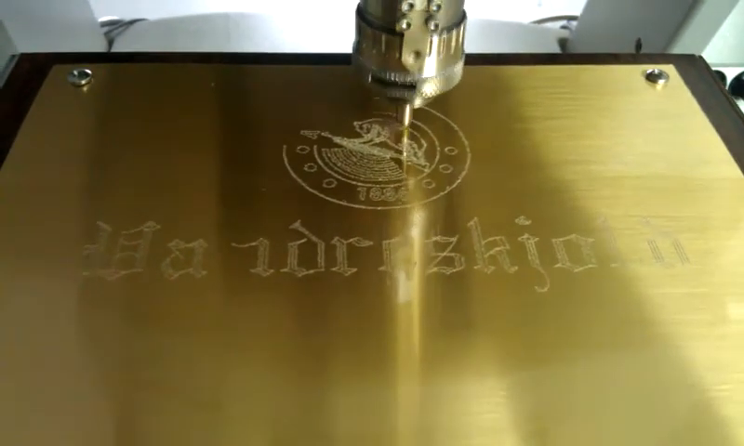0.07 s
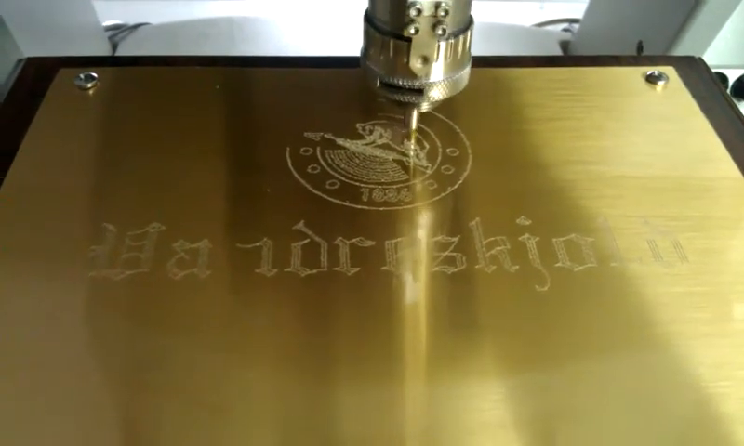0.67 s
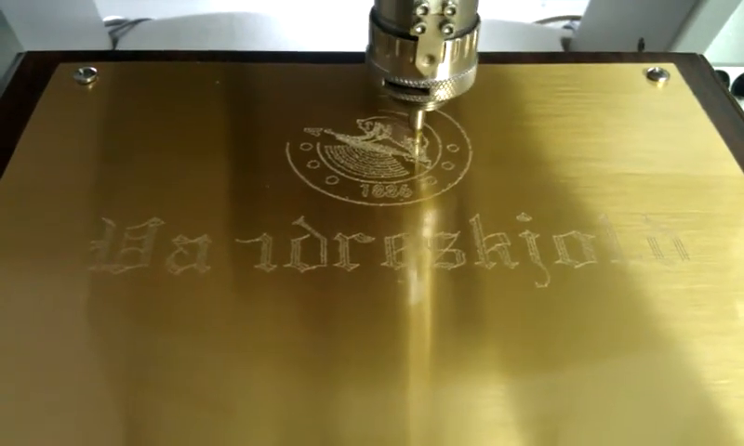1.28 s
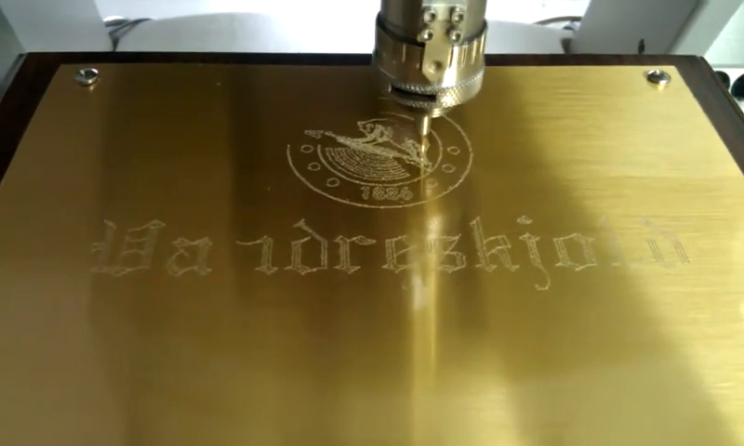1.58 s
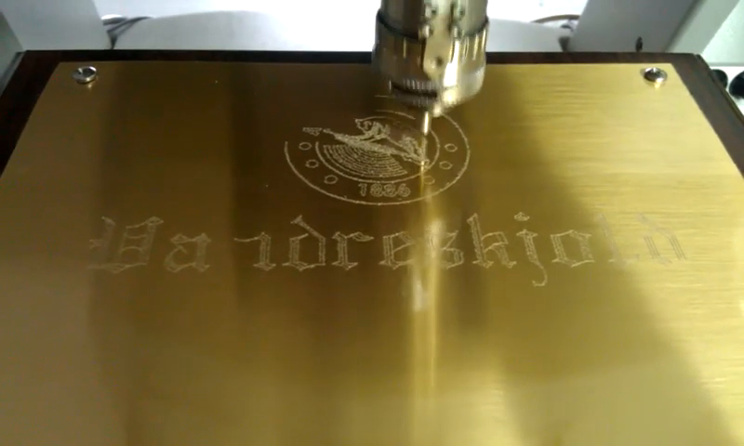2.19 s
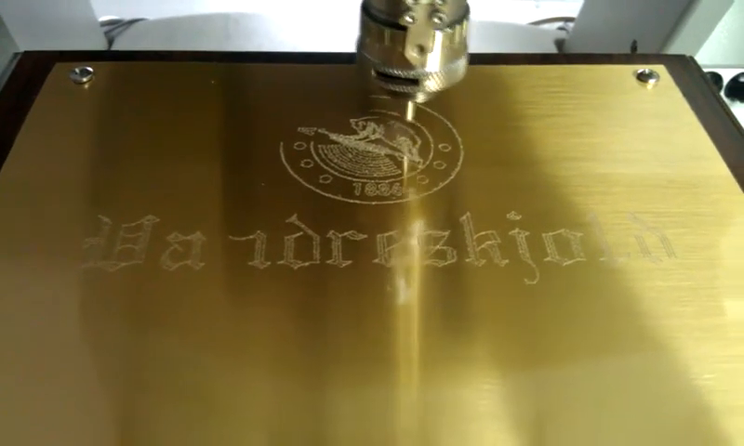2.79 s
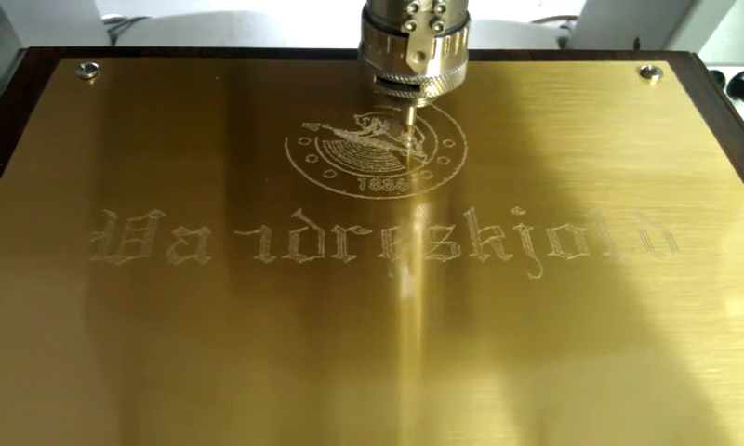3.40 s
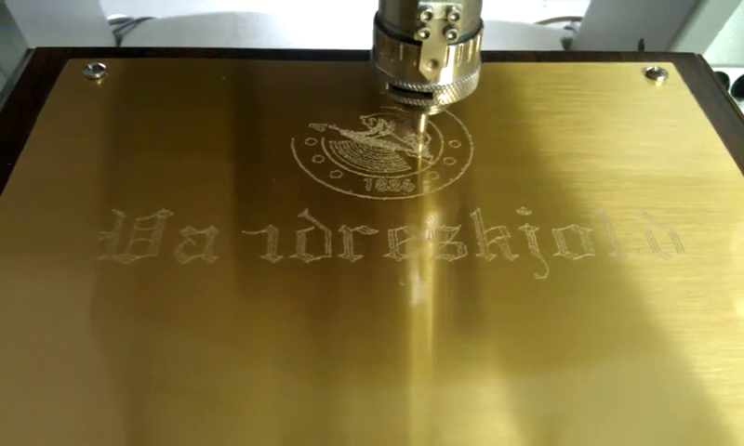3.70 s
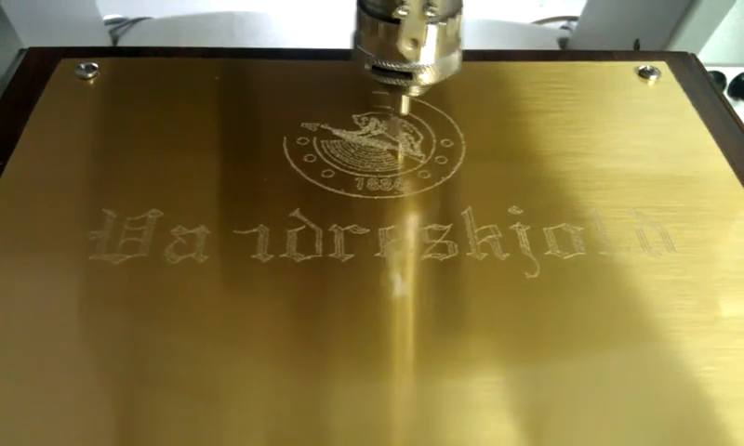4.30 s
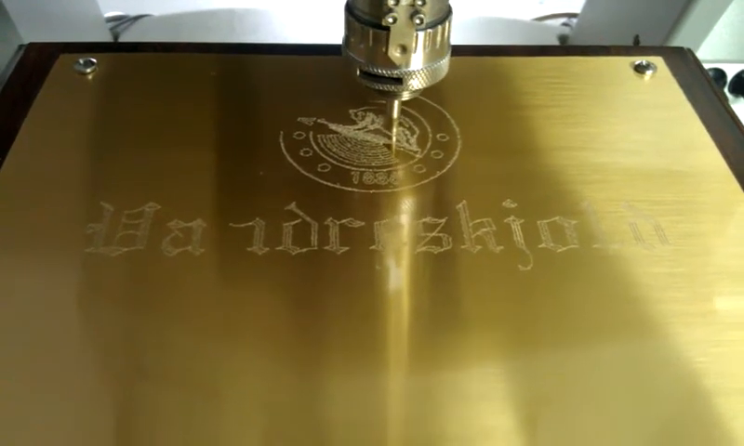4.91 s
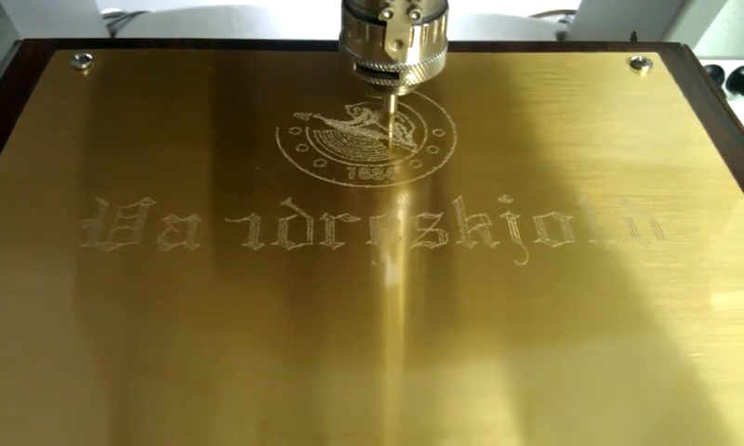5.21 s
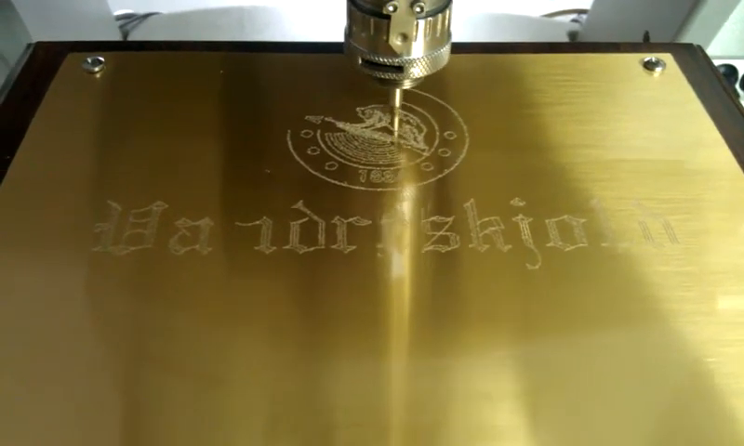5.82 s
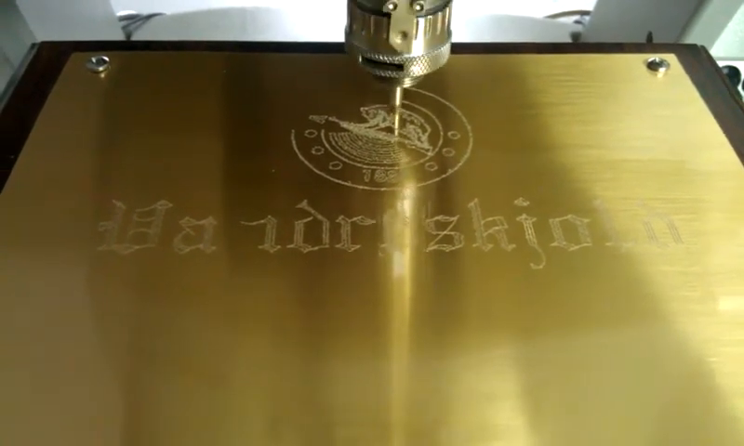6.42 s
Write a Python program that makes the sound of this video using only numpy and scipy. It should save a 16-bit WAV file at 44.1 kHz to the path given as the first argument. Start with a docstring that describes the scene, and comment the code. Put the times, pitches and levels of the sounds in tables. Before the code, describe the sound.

An engraving machine marks a brass plate in a workshop. At first its stylus lifts and drops in a regular pattern of sharp clacks, each with a tiny motor whine. Then the clacks thin out, and the feed motors whirr in uneven runs while the tip scrapes in dry swishes and chatters in the cut. Regular clacks return near the end. The microphone is close, with faint steady room noise behind.

```python
"""A computer-driven engraver marks a brass plate in a workshop, close to a small mono microphone.
A stepper motor lifts the stylus and sets it down with a clack: each move speeds up, cruises and brakes,
sweeping its whine through the modes of the frame while the slide knocks. Between the clacks the feed
motors whirr along each line, and the tip scrapes in dry swishes and chatters in the cut.
Bench and housing give short reflections; the steady noise of the shop lies far behind."""
import sys
import numpy as np
from scipy import signal
from scipy.fft import rfft, irfft
from scipy.io import wavfile

SR = 44100
rng = np.random.default_rng(int(sys.argv[2]) if len(sys.argv) > 2 else 0)


def dump(signal):
    """Clip the signal to [-1, 1] and save it as 16-bit WAV at the path in sys.argv[1]."""
    limited = np.clip(np.atleast_2d(signal).T, -1, 1)
    pcm = np.round(limited * 32767).astype(np.int16)
    wavfile.write(sys.argv[1], SR, pcm)


N = 284445

# The stylus comes up. Each row: start in seconds, squeak of the slide in dB, low thud in dB.
LIFTS = [(.0415, -39.5, -34), (.6541, -38, -58), (1.2732, -36.5, -47), (1.901, -46, -35),
         (2.5603, -65, -68), (4.1046, -65, -35), (5.3656, -65, -43), (6.0452, -64, -42)]
# Modes of the carriage. Each row: frequency in Hz, width in Hz, level in dB.
CARRIAGE_MODES = [(194, 37, -7), (248, 41, -6), (293.2, 44.6, 2), (390, 77, -3.5), (473, 35, 3.5),
                  (587, 88, -3), (653, 51, 0.5), (747, 53, -4), (894, 45, -10.5), (1005, 42, -14),
                  (1340, 55, -15)]


def stylus():
    """Lifts run one programmed move and squeak as the slide comes to rest; drops run another and thump."""
    # The stylus goes down. Each row: start in seconds, level of its knocks in dB, of its thump in dB.
    drops = [(0.2891, .5, -18.5), (.8998, 0, -17), (1.5274, -.5, -18), (2.169, -2, -25), (2.8529, 0, -23),
             (4.3797, -2, -24), (5.6864, 0, -17), (6.2787, 2, -15)]
    # Each move: seconds speeding up, cruising and braking; drive in dB speeding up and braking;
    # hiss in dB speeding up and braking.
    lift_move = (0.0679, 0.0322, 0.068, -10, -14, -26.5, -32)
    drop_move = (0.045, 0.06, 0.029, -16.5, -13.5, -32, -32.5)
    # Contacts of the slide. Each row: seconds into the move, level in dB, corner in Hz, clash in dB.
    lift_knocks = [(0.0134, -18, 2520, -23), (.0288, 0, 800, -36), (.0422, -1, 1590, -31),
                   (.0555, 4, 3000, -13.5), (.0579, 7.5, 540, -21), (.067, -2, 2000, -26),
                   (.129, -4, 1300, -42)]
    drop_knocks = [(.0245, -7, 1720, -38), (.0305, -2, 1160, -36), (.0847, -8, 1100, -38),
                   (.0908, 6, 673, -25), (.0954, 3, 1100, -23), (.1027, 2.5, 600, -33),
                   (.1151, 1, 972, -27)]
    out = np.zeros(N)
    for s, squeak_db, _ in LIFTS:
        add(out, s, move(lift_move, lift_knocks, knocks_db=0))
        add(out, s + 0.17, undb(squeak_db) * squeak())
    for s, knocks_db, thump_db in drops:
        add(out, s + .0828, undb(thump_db) * thump())
        add(out, s, move(drop_move, drop_knocks, knocks_db))
    return out


def move(program, knocks, knocks_db, start_hz=200, cruise_hz=1600, rasp=.6, wobble=.033, rattle_db=-11):
    """One stroke: the motor's whine sweeps through the frame's modes, the slide knocks, metal clashes."""
    # Modes of the frame and plate. Each row: frequency in Hz, width in Hz, level in dB.
    frame_modes = [(287, 40, -10), (375, 58, -10), (473, 34, -7.5), (612, 24, -9), (675, 40, -6),
                   (745, 35, 5.5), (825, 40, -11), (1020, 38, 1.3), (1163, 31, 2), (1250, 50, -8),
                   (1350, 32, 2), (1597, 22, -11.5), (1702, 45, -5.5), (1775, 40, -4.5), (2030, 105, -9),
                   (2248, 70, -3.5), (2840, 60, -20), (3017, 50, -17), (3375, 60, -19)]
    # Spectra of the lead screw's rattle and the driver's hiss. Each row: frequency in Hz, level in dB.
    rattle_spectrum = [(2400, 0), (7000, -35)]
    hiss_spectrum = [(500, 10), (2000, 7), (4500, 3.5), (6200, 0), (7200, -3), (9500, 0), (12000, -9),
                     (15500, -40)]
    # Overtones of the motor's casing. Each row: multiple of the step rate, level in dB.
    casing_overtones = [(3, -55), (4, -64), (4.25, -67), (4.75, -65), (5, -61), (5.75, -66), (6.75, -68)]
    size = SR // 4
    t = np.arange(size) / SR
    up_s, cruise_s, brake_s, up_db, brake_db, up_hiss_db, brake_hiss_db = program
    stages = np.cumsum([0, up_s, cruise_s, brake_s])
    step_hz = np.interp(t, stages, [start_hz, cruise_hz, cruise_hz, start_hz])
    running = np.clip((stages[-1] - t) / 0.0017, 0, 1)
    drive = running * near(step_hz, peak_hz=1020, octave_loss_db=22)
    drive *= undb(np.interp(t, stages[1:3], [up_db, brake_db]))
    hiss = running * near(step_hz, peak_hz=810, octave_loss_db=24)
    hiss *= undb(np.interp(t, stages[1:3], [up_hiss_db, brake_hiss_db]))
    judder = 1 + rasp * walk(800, size)
    force = drive * judder * stepper(step_hz * (1 + wobble * walk(500, size)), overtones_db=[-16])
    # the lead screw rattles as hard as the motor shakes it
    force += undb(rattle_db) * drive * noise(rattle_spectrum, size)
    # the casing sings only near full speed
    phase = 2 * np.pi * np.cumsum(step_hz) / SR
    casing = (step_hz / cruise_hz) ** 20 * sum(undb(db) * np.sin(k * phase) for k, db in casing_overtones)
    airborne = hiss * noise(hiss_spectrum, size) + casing
    scatter = rng.standard_normal((len(knocks), 2))
    for (s, db, corner_hz, clash_db), (late, strong) in zip(knocks, scatter):
        contact_s, contact_db = s + .00015 * late, knocks_db + 1.2 * strong
        add(force, contact_s, undb(db + contact_db) * knock(corner_hz))
        add(airborne, contact_s, undb(clash_db + contact_db) * clash(corner_hz))
    # the frame rings a little differently at each place on the plate
    return ring(force, frame_modes, direct=0.036, detune=.005, uneven_db=0.68, opposed=False) + airborne


def stepper(hz, overtones_db):
    """Torque ripple of a stepper motor: the step rate and its overtones."""
    phase = 2 * np.pi * np.cumsum(hz) / SR
    return np.sin(phase) + sum(undb(db) * np.sin(k * phase) for k, db in enumerate(overtones_db, 2))


def knock(corner_hz):
    """Force of one contact, a push and its rebound: the softer it is, the longer it lasts."""
    u = 2 * np.pi * corner_hz * np.arange(SR // 50) / SR
    return 120 * corner_hz / SR * u ** 2 * (1 - u / 3) * np.exp(-u)


def clash(corner_hz, decay_s=0.0062, reach=4):
    """Loose metal parts strike each other: a short, dense burst, duller after a softer contact."""
    # Spectrum of the loose metal. Each row: frequency in Hz, level in dB.
    metal_spectrum = [(100, -45), (300, 6), (2000, 3), (5800, 1), (7000, -10.5), (11000, -21), (15000, -38)]
    t = np.arange(SR // 10) / SR
    burst = np.exp(-t / decay_s) * rng.standard_normal(len(t))
    dulled = [(hz, db - 10 * np.log10(1 + (hz / (reach * corner_hz)) ** 2)) for hz, db in metal_spectrum]
    return np.std(burst) * colour(np.roll(burst, SR // 2000), dulled) * (1 - t / t[-1])


def thump(hz=345, rise_s=0.0069, waver=0.11):
    """The stylus lands and its holder bounces on the plate for a few cycles."""
    t = np.arange(SR // 12) / SR
    phase = 2 * np.pi * np.cumsum(hz * (1 + waver * walk(249, len(t)))) / SR
    return t / rise_s * np.exp(1 - t / rise_s) * np.sin(phase)


def squeak(hz=8100, width_hz=600, rise_s=0.0037):
    """A brief, narrow chirp of friction in the slide."""
    t = np.arange(SR // 20) / SR
    phase = 2 * np.pi * np.cumsum(hz + width_hz / 2 * walk(1900, len(t))) / SR
    return t / rise_s * np.exp(1 - t / rise_s) * np.sin(phase)


def thuds(hz=76, decay_s=0.0047):
    """A short, low thud under the loudest clack of each lift."""
    out = np.zeros(N)
    t = np.arange(SR // 10) / SR
    for s, _, db in LIFTS:
        add(out, s + 0.054, undb(db) * np.exp(-t / decay_s) * np.sin(2 * np.pi * hz * t))
    return out


def feed_effort(creep_db=-41.5, spurt_db=2.4, spurts_per_s=38):
    """How hard the feed motors work: a slow creep, and runs that start, go on unevenly and stop."""
    # Runs of the feed motors. Each row: start in seconds, length in seconds, level in dB.
    runs = [(0, .06, -28), (.48, 0.018, -35), (.58, .12, -32.5), (1.063, 0.037, -33.5), (1.238, 0.094, -31),
            (1.468, 0.071, -33.5), (1.725, 0.23, -33.5), (2.43, 0.19, -30.5), (2.785, 0.065, -28.5),
            (3.06, .03, -37), (3.315, .03, -35), (3.422, 0.526, -28.5), (3.99, .14, -28.5),
            (4.65, 0.029, -37), (4.786, 0.62, -28), (5.608, 0.085, -30.5), (5.98, .09, -34)]
    # after every lift the carriage travels to the next stroke
    after_s, travel_s, travel_db = 0.185, 0.065, -37.5
    travels = [(s + after_s, travel_s, travel_db) for s, _, _ in LIFTS]
    gains = [undb(db) * swell(s, length_s, rise_db_per_s=143, fall_db_per_s=240)
             for s, length_s, db in runs + travels]
    spurts = unit(undb(spurt_db * walk(spurts_per_s, N)))
    return np.maximum(undb(creep_db), np.max(gains, axis=0)) * spurts


def feed(effort, step_hz=270, spread_octaves=.45, whirr_db=-9, rumble_db=-5):
    """The feed motors follow the drawing in tiny strokes; each change of direction jerks the carriage."""
    # Spectrum of the force on the carriage. Each row: frequency in Hz, level in dB.
    force_spectrum = [(70, -2.5), (190, 0), (330, 1), (480, -1.5), (1200, .5), (2300, -9), (6000, -30),
                      (12000, -64)]
    # Jolts at sharp corners of the drawing. Each row: start in seconds, level in dB.
    corners = [(3.132, -34), (3.277, -40), (3.388, -25), (3.568, -27), (3.655, -29), (3.73, -29.5),
               (3.811, -31), (3.908, -24), (4.025, -30), (4.708, -32), (4.762, -30.5), (4.858, -28.5),
               (4.895, -27.5), (4.953, -22.5), (5.1, -33), (5.155, -26), (5.254, -31), (5.59, -30.5)]
    whirr = unit(stepper(step_hz * 2 ** (spread_octaves * walk(28, N)), overtones_db=[-2, -2, -6]))
    turns = rng.random(N) < 250 / SR  # about 250 a second
    jerks = unit(turns * rng.choice([-1, 1], N) * rng.uniform(.3, 1, N))
    rolling = undb(rumble_db) * rng.standard_normal(N)
    force = colour(jerks + rolling, force_spectrum) + undb(whirr_db) * whirr
    out = effort * unit(ring(force, CARRIAGE_MODES, direct=0.089))
    for s, db in corners:
        add(out, s, undb(db) * shudder())
    return out


def shudder(decay_s=.012, corner_hz=420):
    """A sharp turn shakes the carriage: a short, low rattle, at rms 1 over its first 30 ms."""
    t = np.arange(SR // 8) / SR
    burst = rng.standard_normal(len(t)) * np.exp(-t / decay_s)
    shake = signal.sosfilt(signal.butter(2, corner_hz, fs=SR, output="sos"), burst)
    sound = ring(shake, CARRIAGE_MODES, direct=0.12, detune=.03)
    return sound / np.std(sound[:int(.03 * SR)])


def swishes(effort, groove_db=-23.5, groove_sizzle_db=-11, grit_db=1.5):
    """The tip scrapes the brass, faintly along the groove and strongly in swishes that sizzle on top."""
    # Swishes of the tip. Each row: time of full strength in seconds, hold in seconds, level in dB,
    # sizzle in dB relative to that level, rise and fall in dB per second.
    strokes = [(0, 0.069, -32.5, -13, 299.5, 198), (0.628, 0.053, -36, -12, 400, 200),
               (2.387, 0.19, -35.5, -16, 420, 200), (2.804, 0.082, -40, -22, 300, 200),
               (3.176, 0.016, -26, 0, 578, 125), (3.884, .025, -39.5, -5, 278, 173),
               (4.104, .04, -34.5, -30, 143, 200), (4.31, 0.013, -42, -11, 248, 117),
               (4.415, 0.022, -27.5, 2, 705, 158), (5.17, .1, -47.5, -9, 100, 200),
               (5.312, 0.072, -31.5, -3.5, 650, 198), (5.626, .07, -34, -28, 165, 140),
               (5.722, .12, -27.5, -6, 280, 150), (6.272, 0.13, -47.5, -14, 300, 200)]
    # Spectra of the scrape and its sizzle. Each row: frequency in Hz, level in dB.
    scrape_spectrum = [(150, -55), (500, -14), (1200, -4), (2200, -0.5), (3200, 0.5), (4200, 3.5),
                       (6200, 3.5), (7000, -12), (9000, -11.5), (12000, -74), (15500, -51)]
    sizzle_spectrum = [(1000, -56), (1700, 7), (3500, -1.5), (6500, 10), (8500, 6.5), (11000, 3),
                       (13500, -5), (15800, -9)]
    # at each lift the tip drags brightly until it leaves the brass; same columns as the strokes
    drags = [(s + .028, .024, -44, -1, 800, 900) for s, _, _ in LIFTS]
    scrape = undb(groove_db) * effort
    sizzle = undb(groove_sizzle_db) * scrape
    for s, hold_s, db, sizzle_db, rise_db_per_s, fall_db_per_s in strokes + drags:
        gain = undb(db) * swell(s, hold_s, rise_db_per_s, fall_db_per_s)
        scrape = np.hypot(scrape, gain)
        sizzle = np.hypot(sizzle, undb(sizzle_db) * gain)
    grit = undb(grit_db * walk(220, N))
    return grit * (scrape * noise(scrape_spectrum, N) + sizzle * noise(sizzle_spectrum, N))


def chatter(rise_db_per_s=500, fall_db_per_s=330, grit_db=4):
    """The tip catches in the brass and rattles in brief bursts."""
    # Catches in the cut. Each row: time of full strength in seconds, hold in seconds, level in dB.
    catches = [(3.465, .03, -40), (3.562, 0.024, -37.5), (3.66, 0.013, -36), (3.885, 0.041, -33.5),
               (4.027, 0.076, -37), (4.922, 0.06, -41.5), (5.165, .035, -36), (5.616, 0.068, -31.5)]
    # Spectrum of the tip's force. Each row: frequency in Hz, level in dB.
    tip_spectrum = [(200, -20), (600, -1), (1300, -1.5), (1800, -14.5), (4000, -33)]
    gain = sum(undb(db) * swell(s, hold_s, rise_db_per_s, fall_db_per_s) for s, hold_s, db in catches)
    return gain * unit(noise(tip_spectrum, N) * undb(grit_db * walk(400, N)))


def reflections(x, wet_db=-12, t60_s=0.11, damp_hz=7000):
    """The direct sound, with short reflections from the bench and the machine's housing."""
    t = np.arange(SR // 2) / SR
    tail = rng.standard_normal(len(t)) * undb(-60 * t / t60_s)
    tail = signal.sosfilt(signal.butter(1, damp_hz, fs=SR, output="sos"), tail)
    return x + undb(wet_db) * signal.fftconvolve(x, tail / np.sqrt(np.sum(tail ** 2)))[:N]


def room_tone(level_db=-53.5):
    """The faint, steady noise of the workshop behind the machine."""
    # Spectrum of the shop. Each row: frequency in Hz, level in dB.
    shop_spectrum = [(25, -36), (80, -14), (200, -17), (400, 0), (1100, -9), (2200, -13), (6000, -13.5),
                     (8000, -20.5), (15000, -31.5)]
    return undb(level_db) * noise(shop_spectrum, N)


def ring(force, modes, direct, detune=0, uneven_db=0, opposed=True):
    """A force rings a set of modes, each of which may be a little off in pitch and strength."""
    t = np.arange(SR // 6) / SR
    scatter = rng.standard_normal((len(modes), 2))
    response = np.zeros(len(t))
    for k, ((hz, width_hz, db), (sharp, strong)) in enumerate(zip(modes, scatter)):
        sense = (-1) ** k if opposed else 1  # neighbours swing against each other or together
        gain = sense * undb(db + uneven_db * strong) * 2 * np.pi * width_hz / SR
        response += gain * np.exp(-np.pi * width_hz * t) * np.cos(2 * np.pi * hz * (1 + detune * sharp) * t)
    return signal.fftconvolve(force, response)[:len(force)] + direct * force


def swell(s, hold_s, rise_db_per_s, fall_db_per_s):
    """An envelope that reaches 1 at s seconds, holds and dies away."""
    t = np.arange(N) / SR - s
    return undb(np.minimum(t, 0) * rise_db_per_s - np.maximum(t - hold_s, 0) * fall_db_per_s)


def near(hz, peak_hz, octave_loss_db):
    """Gain of a sound that is strongest at one step rate and falls away on both sides."""
    return undb(-octave_loss_db * np.log2(hz / peak_hz) ** 2)


def colour(x, spectrum):
    """Filter a signal by a curve of (Hz, dB) points and scale it to rms 1."""
    hz, db = np.transpose(spectrum)
    bins_hz = np.maximum(np.fft.rfftfreq(len(x), 1 / SR), 1)
    gain = undb(np.interp(np.log(bins_hz), np.log(hz), db))
    return unit(irfft(rfft(x) * gain, len(x)))


def noise(spectrum, size):
    """Coloured noise at rms 1."""
    return colour(rng.standard_normal(size), spectrum)


def walk(points_per_s, size):
    """A curve that wanders between random points, with a spread near 1."""
    position = np.arange(size) * points_per_s / SR
    points = rng.standard_normal(int(position[-1]) + 2)
    return np.interp(position, np.arange(len(points)), points) * np.sqrt(3 / 2)


def high_pass(x, hz):
    """Cut the bass steeply."""
    return signal.sosfilt(signal.butter(4, hz, "high", fs=SR, output="sos"), x)


def undb(db):
    """Decibels to gain."""
    return 10 ** (np.asarray(db) / 20)


def unit(x):
    """Scale to rms 1."""
    return x / np.sqrt(np.mean(x ** 2))


def add(track, s, sound):
    """Mix a sound in at s seconds."""
    i = max(int(s * SR), 0)
    track[i:i + len(sound)] += sound[:len(track) - i]


def scene():
    """The engraver close up, over the room tone of the shop; its small parts radiate little bass."""
    effort = feed_effort()
    clacks = high_pass(stylus(), hz=200)
    cutting = high_pass(feed(effort) + chatter(), hz=188)
    machine = clacks + cutting + thuds() + swishes(effort)
    return (reflections(machine) + room_tone())[None]


def record(dry, ceiling=.85, top_hz=15800):
    """The recorder flattens only the loudest peaks and cuts the top."""
    limited = dry / (1 + (dry / ceiling) ** 6) ** (1 / 6)
    return signal.sosfilt(signal.ellip(10, .2, 80, top_hz, fs=SR, output="sos"), limited)


dry = scene()
out = record(dry)
dump(out)
```